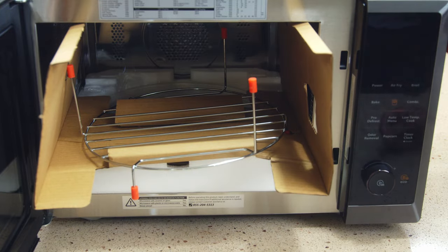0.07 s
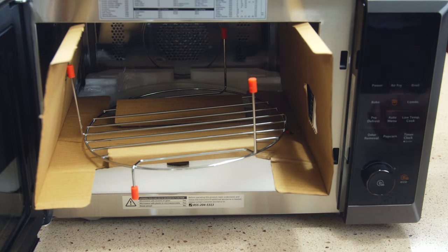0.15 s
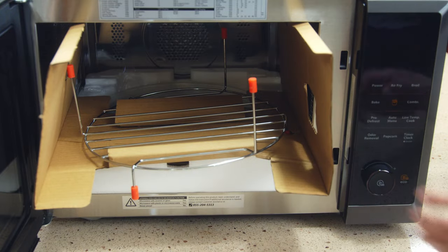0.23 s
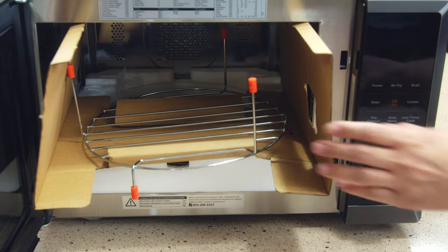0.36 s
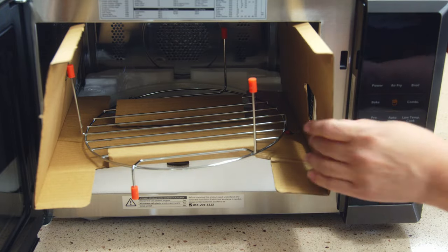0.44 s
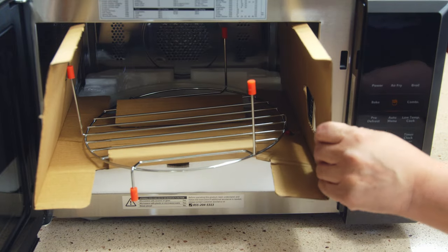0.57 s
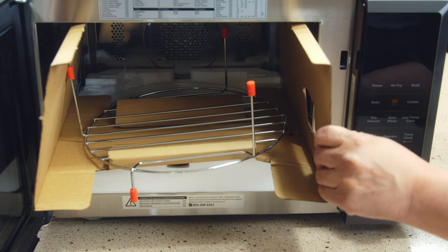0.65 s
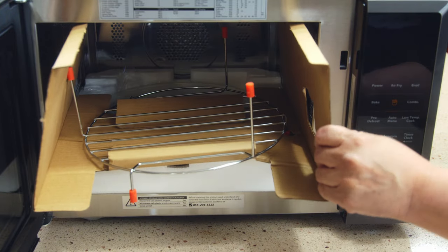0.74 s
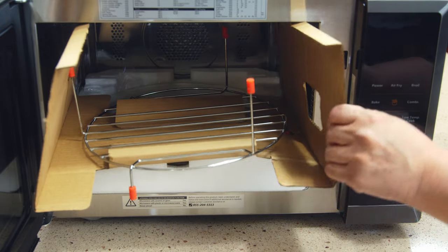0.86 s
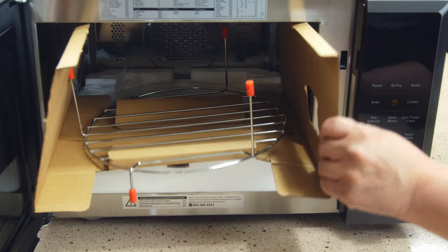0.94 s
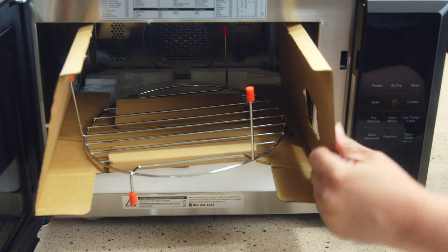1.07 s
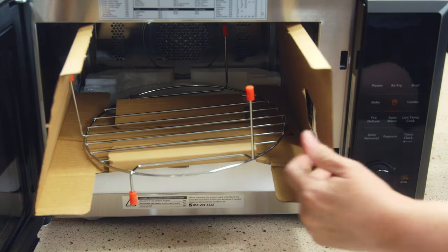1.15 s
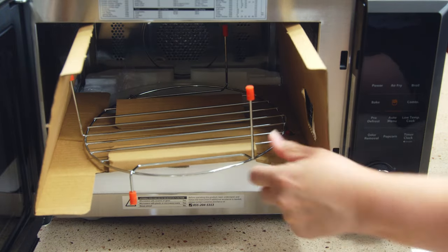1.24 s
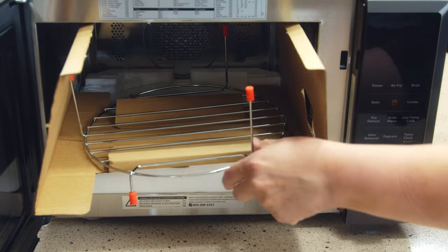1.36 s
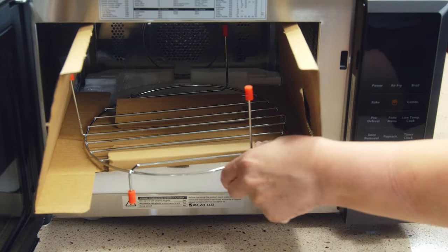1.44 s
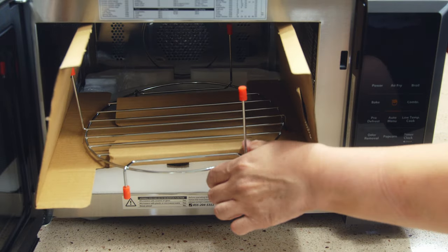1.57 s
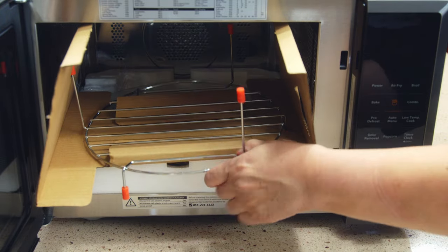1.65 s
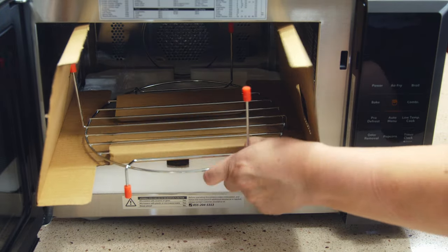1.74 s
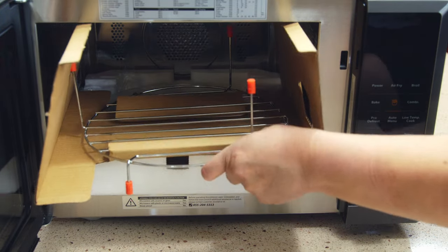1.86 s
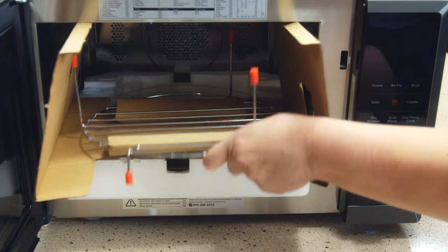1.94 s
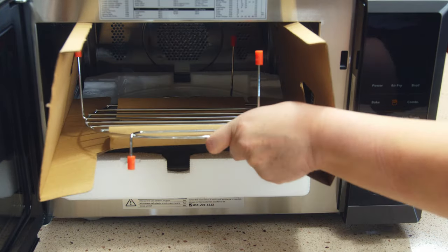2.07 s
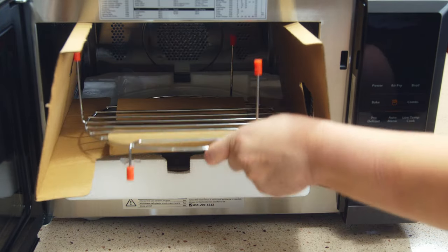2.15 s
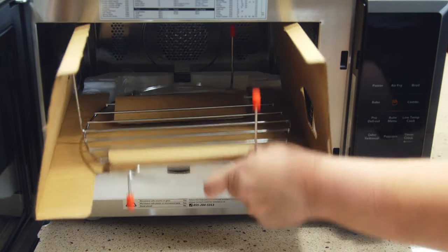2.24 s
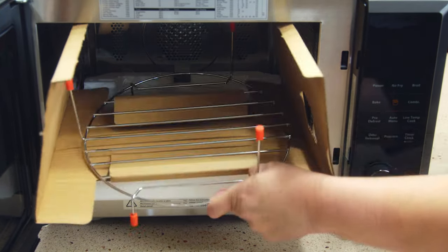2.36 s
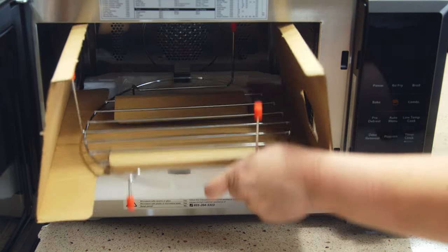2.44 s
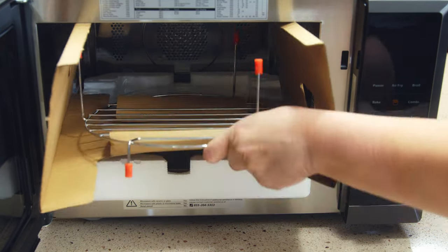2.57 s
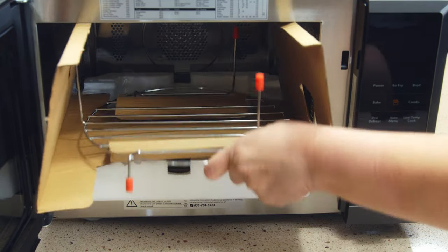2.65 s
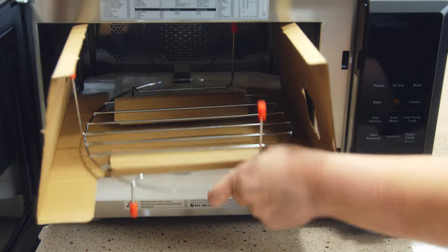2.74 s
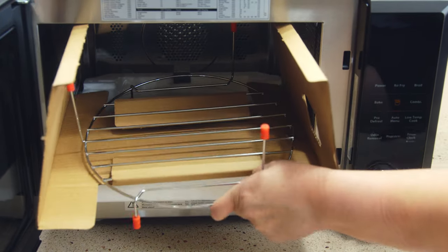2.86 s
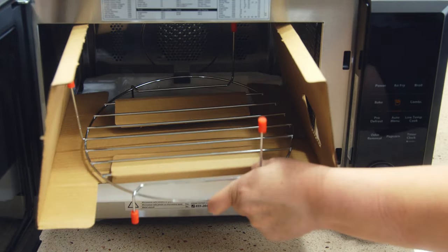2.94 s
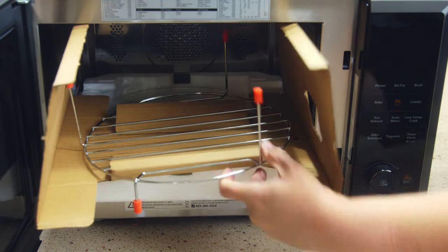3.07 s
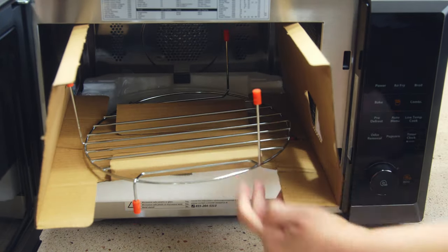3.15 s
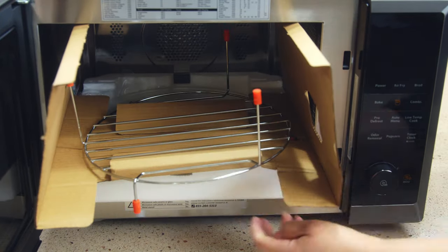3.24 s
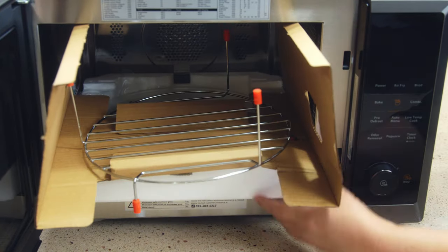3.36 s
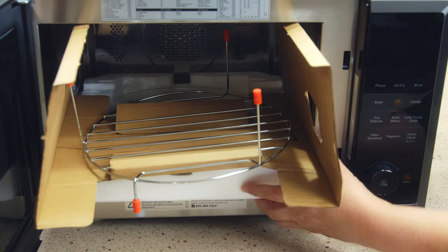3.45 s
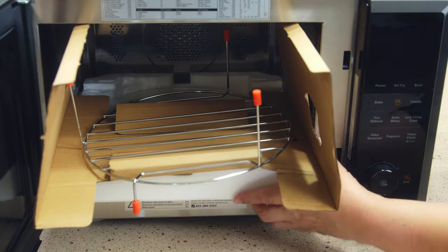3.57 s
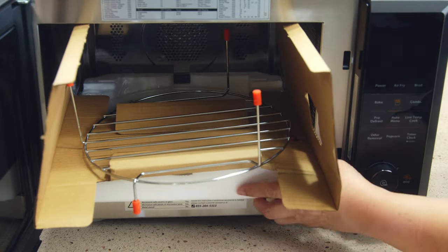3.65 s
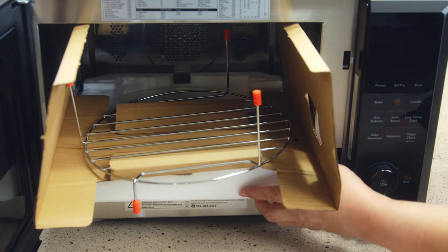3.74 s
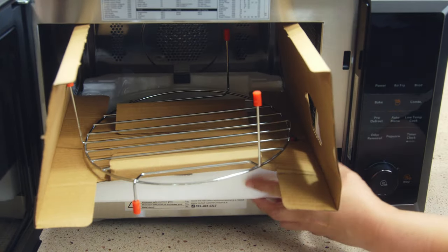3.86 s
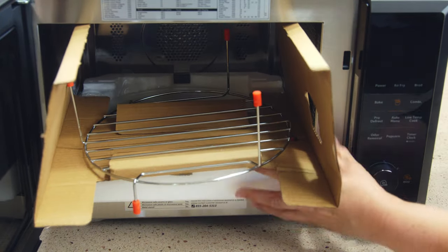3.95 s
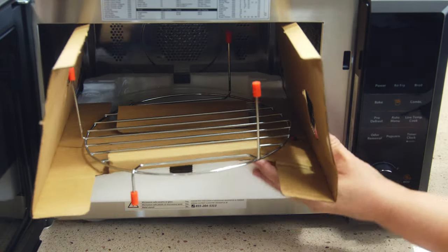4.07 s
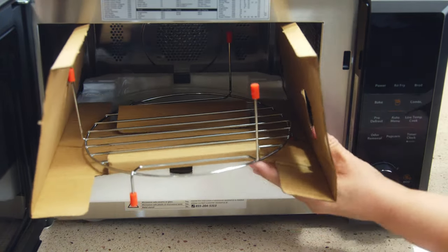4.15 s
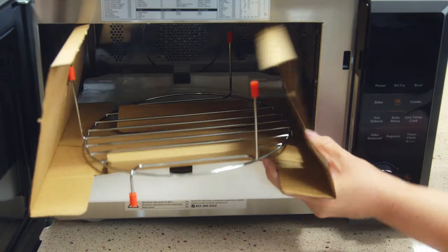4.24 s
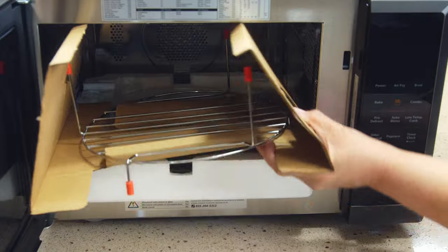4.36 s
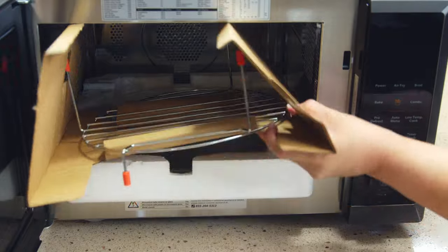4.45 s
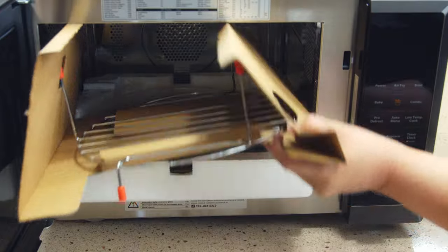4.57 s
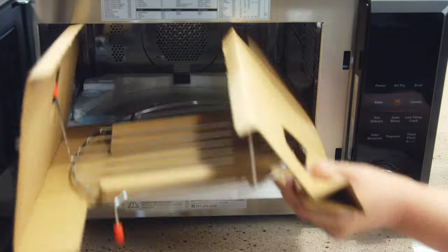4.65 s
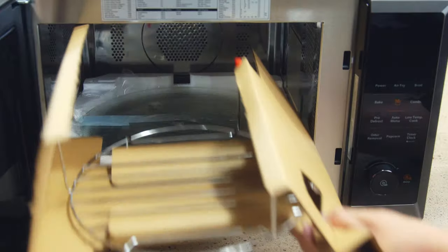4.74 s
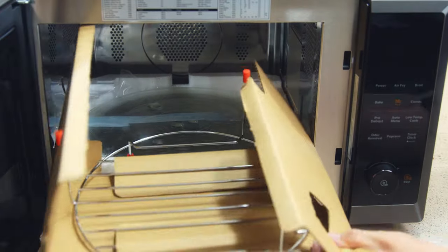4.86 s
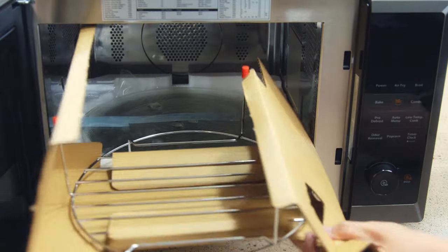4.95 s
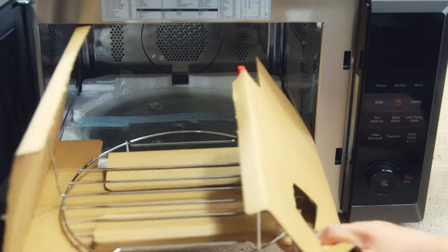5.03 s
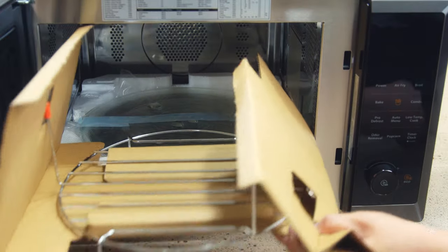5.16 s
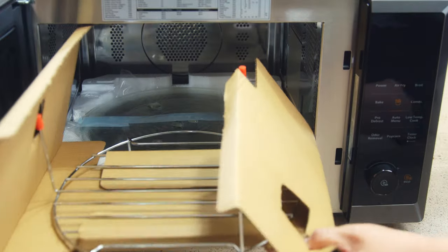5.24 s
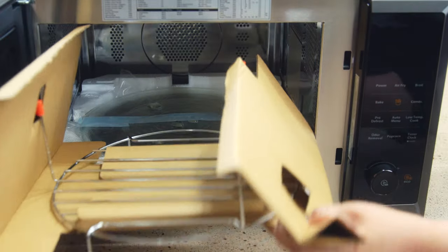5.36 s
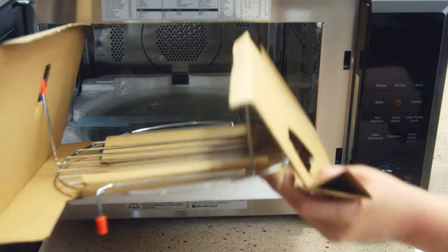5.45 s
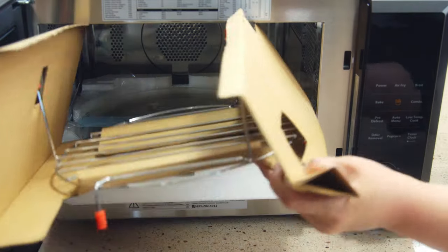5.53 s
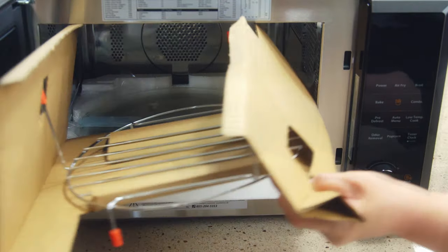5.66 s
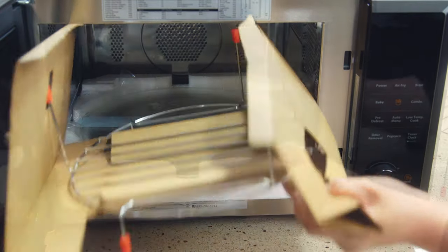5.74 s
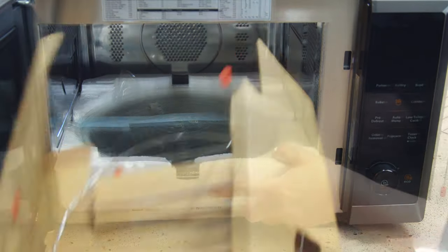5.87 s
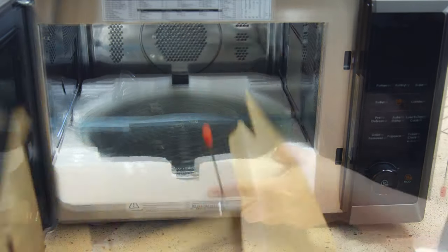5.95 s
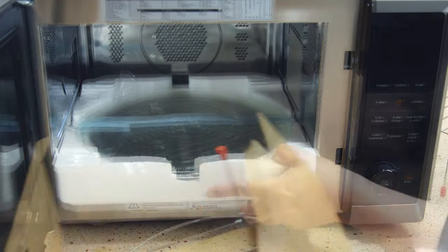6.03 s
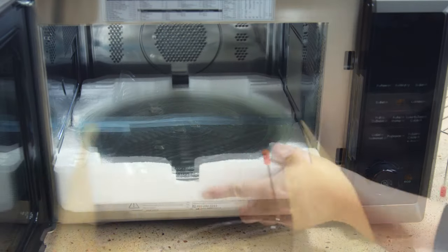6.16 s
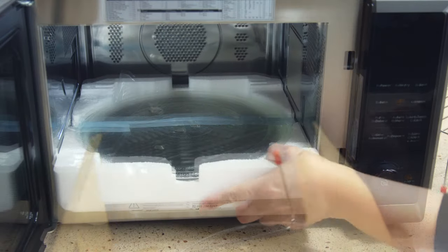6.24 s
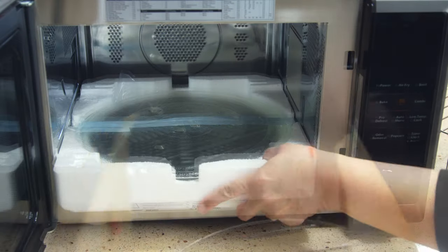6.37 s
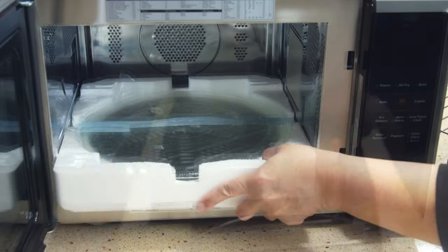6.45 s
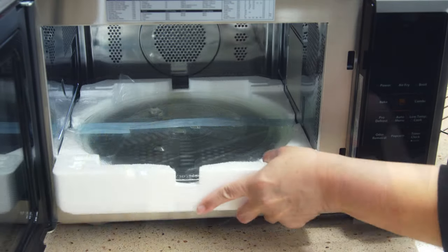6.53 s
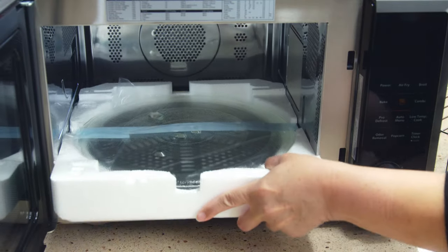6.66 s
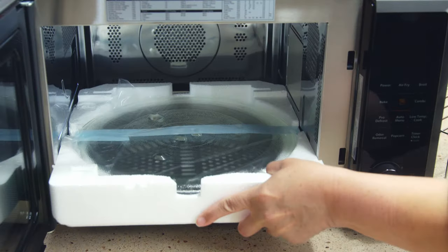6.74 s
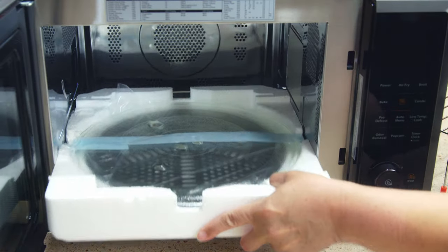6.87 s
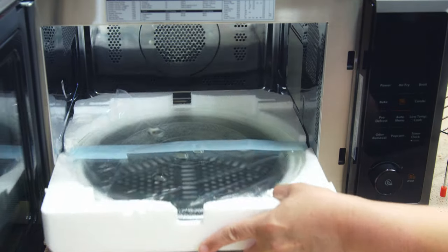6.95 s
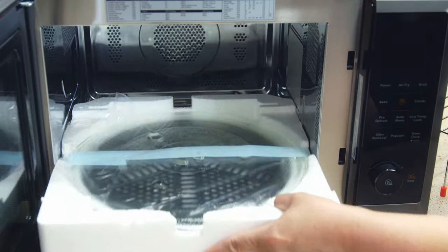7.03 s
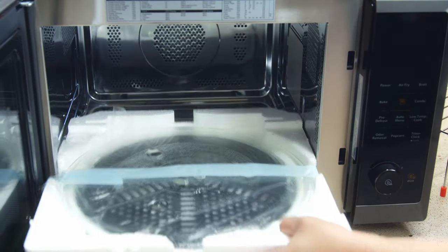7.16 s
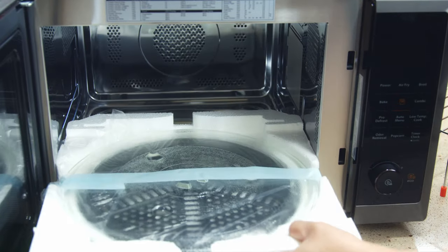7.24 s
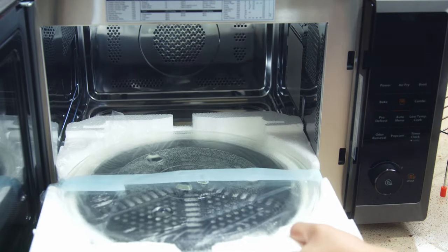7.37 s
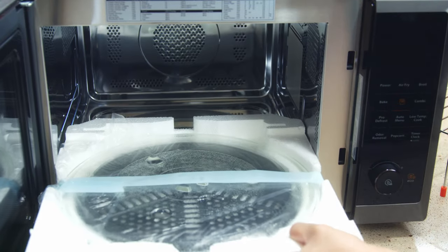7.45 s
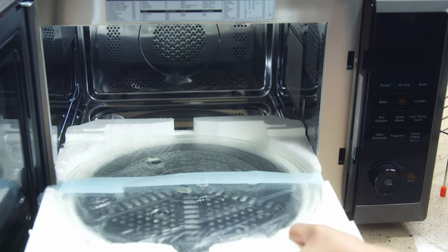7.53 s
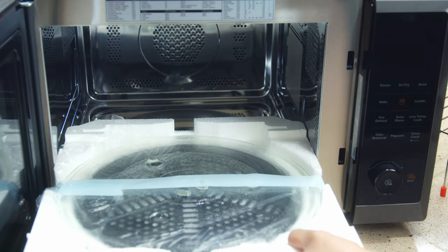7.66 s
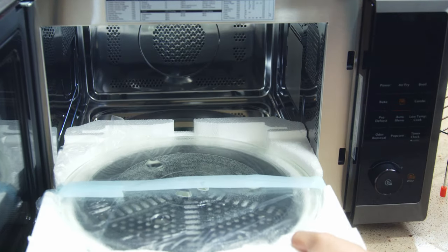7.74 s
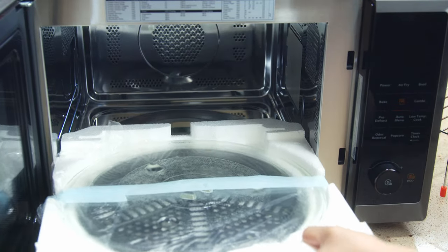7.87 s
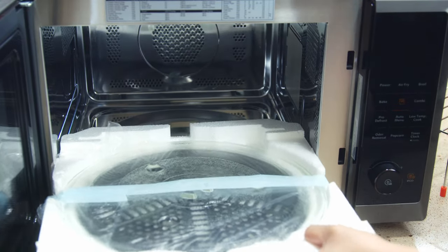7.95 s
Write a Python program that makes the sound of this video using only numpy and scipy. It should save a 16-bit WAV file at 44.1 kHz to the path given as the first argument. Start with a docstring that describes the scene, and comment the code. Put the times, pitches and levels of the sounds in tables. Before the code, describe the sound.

Corrugated card slides against a wire shelf and the inside of an oven in short, scratchy pulls, heard from nearby in a quiet room. Small snaps and woody taps mix with hollow thumps and a faint metal ring. After a louder scrape and a few short groans from the card, foam packing drags out with a more even hiss, squeaks very briefly, bumps the cabinet and eases off.

```python
"""Hissing stop-start rubs and hollow knocks, close up: a hand pulls corrugated card, then a foam block,
out of a steel oven cabinet. Skin, card and foam slide in tiny slips that make the hiss and excite the
wire shelf and stiff folds. Fibres snap, edges tap, card judders and foam squeaks. The packing drags
and bumps against the cabinet, whose panels ring and boom in a quiet kitchen."""
import sys
import numpy as np
from scipy import signal
from scipy.fft import rfft, irfft
from scipy.io import wavfile
from scipy.ndimage import uniform_filter1d

SR = 44100
rng = np.random.default_rng(int(sys.argv[2]) if len(sys.argv) > 2 else 0)


def generate_wav(signal):
    """Clip the signal to [-1, 1] and save it as 16-bit WAV at the path in sys.argv[1]."""
    frames = np.transpose(np.atleast_2d(signal))
    scaled = np.clip(frames, -1, 1) * 32767
    pcm = np.round(scaled).astype(np.int16)
    wavfile.write(sys.argv[1], SR, pcm)


N = 352888

def gain_of(db):
    return 10 ** (np.asarray(db) / 20)

def unit_rms(x):
    return x / np.sqrt(np.mean(x ** 2) + 1e-20)

def add(mix, start_s, sound):
    part = mix[round(start_s * SR):][:len(sound)]
    part += sound[:len(part)]

def colour(x, spectrum):
    """Filter by (frequency [Hz], level [dB]) points; unit rms out."""
    hz, db = np.transpose(spectrum)
    bin_hz = np.fft.rfftfreq(len(x), 1 / SR)
    bin_db = np.interp(np.log(bin_hz + 1), np.log(hz), db, -80, -80)
    return unit_rms(irfft(rfft(x) * gain_of(bin_db), len(x)))

def wander(rate_hz):
    """Smooth random drift, unit rms."""
    span = int(SR / rate_hz)
    return unit_rms(uniform_filter1d(uniform_filter1d(rng.standard_normal(N), span), span))

def friction(slips_per_s, slip_s, slip_depth, flicker_db):
    """Flickering noise plus sudden slips: short dying bursts, few of them large."""
    sizes = gain_of(4 * np.minimum(rng.exponential(1, N), 3))
    onsets = rng.random(N) < slips_per_s / SR
    slips = signal.lfilter([1], [1, -np.exp(-1 / (slip_s * SR))], sizes * onsets)
    envelope = (1 + slip_depth * unit_rms(slips)) * gain_of(flicker_db * wander(67))
    return unit_rms(envelope * rng.standard_normal(N))

def patchy(x, depth_db):
    """Drifting spectral peaks and dips as the contact crosses flutes and gaps."""
    spectra = signal.stft(x, nperseg=512)[2]
    patches = uniform_filter1d(rng.standard_normal(spectra.shape), size=4, axis=0)
    patches = unit_rms(uniform_filter1d(patches, size=14, axis=1))
    return unit_rms(signal.istft(spectra * gain_of(depth_db * patches), nperseg=512)[1][:N])

def swells(rows):
    """Power sum of envelopes: (peak time [s], level [dB], 20 dB rise [s], 20 dB fall [s])."""
    t = np.arange(0, N + 32, 32) / SR
    bend = 1.13  # above 1: holds near the peak, then stops short
    power = sum(gain_of(db - 20 * np.maximum((peak_s - t) / rise_s, (t - peak_s) / fall_s) ** bend) ** 2
                for peak_s, db, rise_s, fall_s in rows)
    return np.interp(np.arange(N) / SR, t, np.sqrt(power))

def room_tone():
    """Quiet kitchen: low noise with a faint hiss."""
    spectrum_hz_db = [(40, 8), (110, 22), (239, -14), (473, 20.5), (782, -17), (2200, -40),
                      (6000, -8), (15900, -17)]
    return gain_of(-46.5) * colour(rng.standard_normal(N), spectrum_hz_db)

def steel_walls(x, t60_s=0.45):
    """Dense short reflections inside the cabinet add a faint ring."""
    t = np.arange(8000) / SR
    tail = rng.standard_normal(len(t)) * gain_of(-60 * t / t60_s) * (t > 0.002)
    return gain_of(-12.5) * signal.oaconvolve(x, tail / np.linalg.norm(tail))[:N]

# cabinet and card panel modes: (frequency [Hz], relative level [dB], nominal ring time [s])
PANEL_MODES = [(167.6, -1.5, 0.27), (205.2, 1.5, 0.15), (244.5, -9.5, 0.24), (310, -4, 0.17),
               (507, -13, 0.1)]
BOOM_HZ, BOOM_T60_S = 127, 0.66  # deepest panel
def panels(force):
    """The panels ring under a force, deaf to its treble."""
    soft = signal.sosfilt(signal.butter(2, 800, fs=SR, output="sos"), force)
    return sum(gain_of(db) * resonate(soft, hz, 1.95 / ring_s) * np.sqrt(ring_s)
               for hz, db, ring_s in PANEL_MODES)

def resonate(x, hz, width_hz):
    """Two-pole resonance, unity gain at its centre."""
    return signal.lfilter(*signal.iirpeak(hz, hz / abs(width_hz), SR), x)

# weight of the load on the cabinet: (time [s], drag gain [dB], scrape gain [dB], grit gain [dB])
LOAD_GAINS = [(0, -47, -18, 0.5), (0.7, -45, -6, -0.5), (0.9, -26.5, 7.5, 6), (1.22, -55, -8, 6),
              (1.45, -31, 5.5, 4.5), (1.75, -21, 0, 1), (1.93, -32.5, 0, -0.5), (2.6, -25.5, 3, 2.2),
              (2.98, -40, 4.5, 1), (4.6, -20.5, -4, -1), (5.3, -42.5, 1.5, -2), (5.6, -22.5, -1.5, 2.4),
              (6.0, -17, -4, -0.5), (6.19, -31, -1, 2.5), (7.35, -32.5, -4, 1), (7.55, -50, -9, -3),
              (8, -43, -17, -5.5)]
def load_gain(layer):
    """Linear gain of one friction layer as the load bears down and eases."""
    times_s, *curves_db = np.transpose(LOAD_GAINS)
    db = curves_db[("drag", "scrape", "grit").index(layer)]
    return gain_of(np.interp(np.arange(N) / SR, times_s, db))

def dragging():
    """The sliding load shakes the panels and rumbles; it shifts around each blow."""
    contact = friction(slips_per_s=60, slip_s=0.014, slip_depth=0.8, flicker_db=2)
    ring = unit_rms(panels(contact)) + 0.35 * unit_rms(resonate(contact, BOOM_HZ, 2.9 / BOOM_T60_S))
    rumble = colour(rng.standard_normal(N), [(40, -37), (110, -0.5), (250, 2), (600, -17)])
    shake = swells([(time_s, db - 10.5, 0.014, 0.13) for time_s, db, *_ in CABINET_BLOWS])
    return (load_gain("drag") + shake) * unit_rms(ring + rumble)

# card judders: (start [s], end [s], first pitch [Hz], last pitch [Hz], level [dB], relative octave [dB])
CARD_JUDDERS = [(5.89, 5.947, 167, 161, -13, 2), (6.05, 6.158, 169.6, 184, -11, -15),
                (6.894, 6.945, 244, 207, -14.5, -32)]
def card_groans():
    """Nearly regular slips: a wavering tone and its octave under an arched envelope."""
    out, waver = np.zeros(N), wander(60)
    for start_s, end_s, first_hz, last_hz, db, octave_db in CARD_JUDDERS:
        progress = np.linspace(0, 1, round((end_s - start_s) * SR))
        glide_hz = first_hz + (last_hz - first_hz) * progress
        pitch_hz = glide_hz * (1 + 0.029 * waver[round(start_s * SR):][:len(progress)])
        phase = 2 * np.pi * np.cumsum(pitch_hz) / SR
        arch = np.sin(np.pi * progress ** 1.04) ** 0.49
        add(out, start_s, gain_of(db) * arch * (np.sin(phase) + gain_of(octave_db) * np.sin(2 * phase)))
    return out

# course of the foam's squeak: (time [s], pitch [Hz], level [dB])
SQUEAK_PATH = [(6.912, 10170, -21), (6.94, 10500, -12), (6.954, 10200, -21)]
def foam_squeak():
    """A brief high stick-slip tone, unsteady in level and pitch."""
    times_s, hz, db = np.transpose(SQUEAK_PATH)
    t, out = np.arange(times_s[0], times_s[-1], 1 / SR), np.zeros(N)
    level_db = np.interp(t, times_s, db) + 4.4 * wander(400)[:len(t)]
    pitch_hz = np.interp(t, times_s, hz) * (1 + 0.0072 * wander(900)[:len(t)])
    add(out, times_s[0], gain_of(level_db) * np.sin(2 * np.pi * np.cumsum(pitch_hz) / SR))
    return out

# strokes over a hollow: (start [s], end [s], centre [Hz], width [Hz], level [dB])
HOLLOW_STROKES = [(1.41, 1.62, 5160, 1000, -25), (0.79, 0.954, 275, 40, -27.5), (3.5, 3.57, 610, 140, -27),
                  (4.569, 4.633, 3600, 280, -22.5), (4.584, 4.696, 11500, 2200, -19.5),
                  (6.838, 6.868, 7650, 2700, -9.5), (7.325, 7.41, 820, 130, -21.5),
                  (4.3, 4.85, 330, 460, -28), (5.86, 6.08, 460, 40, -18), (6.655, 6.763, 390, 470, -25)]
def hollows():
    """Each stroke over a hollow adds its own burst of noise through one resonance, faded in and out."""
    out = np.zeros(N)
    for start_s, end_s, hz, width_hz, db in HOLLOW_STROKES:
        noise = rng.standard_normal(round((end_s - start_s) * SR))
        band = unit_rms(resonate(noise, hz, width_hz))
        add(out, start_s, gain_of(db) * band * signal.windows.tukey(len(noise), 0.8))
    return out

# fibres and folds letting go: (time [s], relative level [dB], pitch [Hz])
FIBRE_SNAPS = [(0.486, 1.5, 8200), (1.0176, 2.5, 9800), (1.2578, -8.5, 7300), (1.496, 2, 10400),
               (1.642, 5.5, 5440), (1.7328, 3, 10500), (1.97, -1, 4040), (2.149, -7, 12200),
               (2.21, -7.5, 4170), (2.318, 1, 9200), (2.342, -4.5, 5940), (2.4857, -5, 4030),
               (2.714, -24, 3020), (3.384, -9, 9700), (3.499, -1.5, 5500), (4.3144, -9, 4420),
               (5.007, 4.5, 7160), (5.436, -4.5, 4530), (5.7608, -0.5, 8150), (5.894, -5, 6840),
               (5.9823, -5.5, 3500), (6.431, -9.5, 11000), (7.0239, 2.5, 9200), (7.16, 2.5, 5200),
               (7.186, 1.5, 9300), (7.254, 2, 6000), (7.899, -5.5, 7200), (7.955, -7.5, 10400)]
def fibre_snaps(click_t60_s=0.0042, tail_t60_s=0.05):
    """Each break is a sharp, loosely pitched click with a short crumpling tail."""
    t, out = np.arange(2000) / SR, np.zeros(N)
    envelope = gain_of(-60 * t / click_t60_s) + gain_of(-6 - 60 * t / tail_t60_s)
    for time_s, db, hz in FIBRE_SNAPS:
        noise = rng.standard_normal(len(t))
        click = unit_rms(resonate(noise, hz, 0.32 * hz)) + 0.84 * noise
        add(out, time_s, gain_of(db - 11.5) * click * envelope)
    return out

# hard edges striking the shelf and folds: (time [s], relative level [dB], nominal pitch [Hz])
EDGE_TAPS = [(1.017, -16, 1530), (1.54, -15, 980), (1.971, 1.5, 972), (2.189, -10, 1270), (2.484, -5, 734),
             (2.622, -15.5, 1710), (2.715, -9.5, 645), (3.501, -6, 1580), (3.987, -4, 1042),
             (4.199, -12, 1060), (4.313, 0, 930), (4.449, -6.5, 667), (4.758, -10, 950), (5.076, -14, 923),
             (5.502, 2.5, 610), (5.664, -6, 1465), (5.829, -19, 2680), (5.84, -4.5, 990), (5.896, -8, 970),
             (5.929, -10, 1050), (5.95, -7, 1082), (5.986, 1.5, 910), (6.679, -10.5, 1000),
             (6.823, -18.5, 1670), (7.894, -16, 855)]
def edge_taps(ring_t60_s=0.048, crack_t60_s=0.02):
    """Each strike gives a short hollow ring that bends upward, and a woody crack."""
    t, out = np.arange(5000) / SR, np.zeros(N)
    for time_s, db, hz in EDGE_TAPS:
        noise = rng.standard_normal(len(t))
        chirp = np.sin(2 * np.pi * hz * t * (0.96 + 2 * t))
        tone = chirp + 0.35 * unit_rms(resonate(noise, hz, 0.1 * hz))
        ring = gain_of(-60 * t / ring_t60_s) * np.minimum(t / 0.00073, 1) * tone
        crack = gain_of(-8 - 60 * t / crack_t60_s) * unit_rms(resonate(noise, 1200, 4000))
        add(out, time_s, gain_of(db - 4) * (ring + crack))
    return out

# packing hits the cabinet: (time [s], relative level [dB], card pitch [Hz], boom gain over thump [dB])
CABINET_BLOWS = [(0.489, -18, 161, -28), (0.782, -4, 197, -23), (0.95, -16.5, 228, -12),
                 (1.021, -20, 105, -20), (1.105, -10, 291, -33), (1.258, -11.5, 166, -43.5),
                 (1.541, -18, 202, -12), (1.649, -10.5, 172, -8), (1.733, -9, 233, -12),
                 (1.974, 0.5, 206, -10), (2.235, 0.5, 209, -10.5), (2.478, -1, 210, -15),
                 (2.716, -1, 232, -10.5), (3.028, -10, 280, -20), (3.082, 0, 239, -9.5),
                 (3.503, -8.5, 163, -25), (3.609, -14, 175, -5), (3.754, -2.5, 221.4, -21),
                 (3.967, -5, 202, -2.5), (4.228, -9, 175, -10), (4.292, -9, 170, -18),
                 (4.313, -2, 232, -20), (4.46, -4.5, 239, -12.5), (4.54, -6.5, 230, -19),
                 (4.702, -5.5, 327, -20), (4.772, -1, 239, -15), (5.007, -8, 162, -21.5),
                 (5.427, -18, 129, 4), (5.506, 0.5, 170, -31), (5.798, -15.5, 270, -15),
                 (5.842, -12, 125, 5), (5.99, -2.5, 127, -28), (6.04, -10, 263, -28),
                 (6.685, -20.5, 265, -21), (6.935, -25.5, 211, 6.5), (7.17, -10.5, 228, -0.5)]
def knocks(thump_t60_s=0.096, rattle_t60_s=0.048):
    """The card thumps, the deepest panel booms, and the settling load rattles the others into ringing."""
    t = np.arange(20000) / SR
    out, force = np.zeros((2, N))
    boom = gain_of(-60 * t / BOOM_T60_S) * (1 - np.exp(-t / 0.025)) * np.sin(2 * np.pi * BOOM_HZ * t)
    thump_envelope = gain_of(-60 * t / thump_t60_s) * (1 - np.exp(-t / 0.00089))
    for time_s, db, hz, boom_db in CABINET_BLOWS:
        thump = thump_envelope * np.sin(2 * np.pi * hz * t)
        add(out, time_s, gain_of(db + 0.5) * (thump + gain_of(boom_db) * boom))
        rattle = gain_of(db - 60 * t[:4000] / rattle_t60_s) * rng.standard_normal(4000)
        add(force, time_s, rattle)
    return out + gain_of(29) * panels(force)

# modes of the wire shelf and stiff folds: (frequency [Hz], width [Hz], relative level [dB])
SHELF_MODES = [(877, 68, -2), (1030, 680, 6.5), (1246, 990, 5.5), (3590, 99, 6.5)]
def scraping():
    """Coarse slips excite the shelf and folds, with each stroke and as an edge grates on after a tap."""
    contact = friction(slips_per_s=90, slip_s=0.0037, slip_depth=0.4, flicker_db=2.5)
    contact = patchy(contact, depth_db=3.5)
    body = sum(gain_of(db) * resonate(contact, hz, width_hz) for hz, width_hz, db in SHELF_MODES)
    grate = swells([(time_s, db - 17, 0.01, 0.11) for time_s, db, _ in EDGE_TAPS])
    return gain_of(-7) * (load_gain("scrape") * swells(SLIDE_STROKES) + grate) * unit_rms(body)

# main rubbing hiss: (frequency [Hz], relative density [dB])
HISS_SPECTRUM = [(1000, -15.5), (2700, -3.5), (4000, 3), (5500, 5.5), (7500, 4), (9000, -12)]
# finest grit: (frequency [Hz], relative density [dB])
GRIT_SPECTRUM = [(7000, -37), (8500, -13), (10500, -12.5), (13000, -16.5), (16500, -23)]
# skin, card and foam sliding: (peak time [s], relative level [dB], 20 dB rise [s], 20 dB fall [s])
SLIDE_STROKES = [(0.002, -43, .1, 0.28), (0.515, -21.5, 0.091, 0.034), (0.6, -31, 0.1, 0.14),
                 (0.836, -32, 0.72, 0.022), (1.012, -31.5, 0.014, 0.4), (1.1, -22.5, 0.17, 0.081),
                 (1.37, -30, 0.15, 1), (1.654, -24, 0.19, 0.11), (1.749, -17.5, 0.02, 0.005),
                 (1.808, -25, 0.17, 0.067), (1.983, -19, 0.092, 0.043), (2.202, -21.5, 0.043, 0.14),
                 (2.497, -27, 0.17, 0.089), (2.776, -28, 0.27, 0.13), (3.076, -21.5, 0.17, 0.023),
                 (3.1, -37, 0.037, 0.17), (3.505, -23.5, 0.1, 0.042), (3.644, -27.5, 0.27, 0.062),
                 (3.759, -23, 0.048, 0.024), (3.894, -33.5, 0.18, 0.52), (4.028, -24, 0.14, 0.12),
                 (4.213, -25, 0.14, 0.17), (4.47, -25, 0.029, 0.29), (4.634, -21, 0.27, 0.025),
                 (4.75, -20, 0.14, 0.2), (4.931, -21.5, 0.04, 0.41), (5.021, -18.5, 0.035, 0.082),
                 (5.214, -36, 0.066, 0.095), (5.43, -24.5, 0.11, 0.25), (5.695, -11.5, 0.057, 0.047),
                 (5.76, -22, 0.018, 0.19), (5.902, -11.5, 0.0082, 0.017), (6.154, -31.5, 0.005, 0.54),
                 (6.28, -19.5, 0.086, 0.088), (6.697, -24, 0.2, 0.18), (6.824, -15, 0.0047, 0.031),
                 (7.3, -21.5, 1, 0.0072), (7.436, -26, 0.33, 0.029), (7.6, -29, 0.46, 1.4)]
def rubbing(touch_s=0.43, foam_start_s=6.15, foam_grain=0.45):
    """One contact drives both hiss bands, so they flicker together; foam slides more evenly than card."""
    t = np.arange(N) / SR
    grain = np.where(t < foam_start_s, t > touch_s, foam_grain)
    rough = grain * friction(slips_per_s=300, slip_s=0.003, slip_depth=0.8, flicker_db=2)
    smooth = np.sqrt(1 - grain ** 2) * rng.standard_normal(N)
    contact = patchy(rough + smooth, depth_db=3)
    grit = load_gain("grit") * colour(contact, GRIT_SPECTRUM)
    return gain_of(-3) * swells(SLIDE_STROKES) * (colour(contact, HISS_SPECTRUM) + grit)

def scene():
    """Mono mix; only the bright layers reflect off the steel walls."""
    room = room_tone()
    bright = rubbing() + scraping() + hollows() + foam_squeak() + edge_taps() + fibre_snaps()
    return (room + bright + steel_walls(bright) + dragging() + knocks() + card_groans())[None]

def record(dry, low_cut_hz=70, band_limit_hz=15950):
    """Microphone: bass cut, soft overload on peaks, band limit."""
    thinned = signal.sosfilt(signal.butter(2, low_cut_hz, "high", fs=SR, output="sos"), dry)
    saturated = 0.8 * np.tanh(thinned / 1.176)
    lowpass = signal.firwin(511, band_limit_hz, window=("kaiser", 9), fs=SR)
    return signal.oaconvolve(saturated, lowpass[None], "same")

dry = scene()
out = record(dry)
generate_wav(out)
```